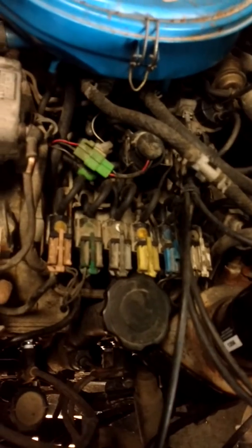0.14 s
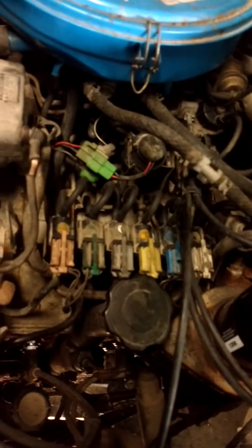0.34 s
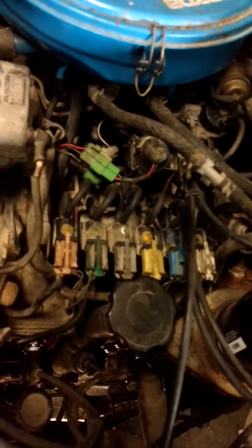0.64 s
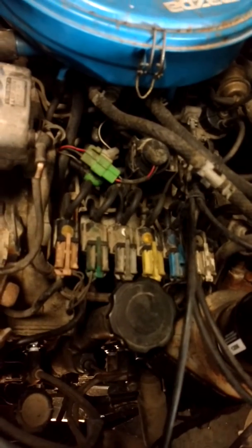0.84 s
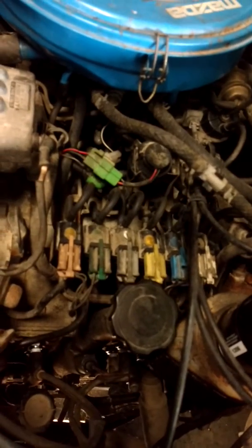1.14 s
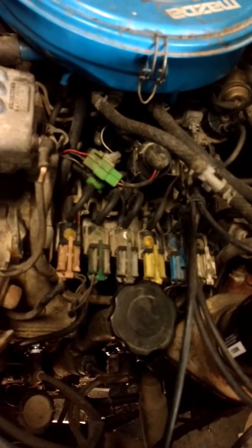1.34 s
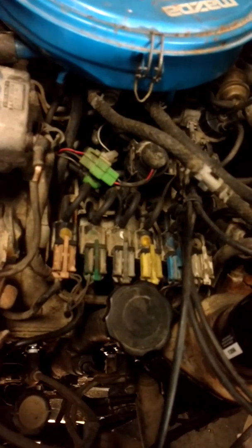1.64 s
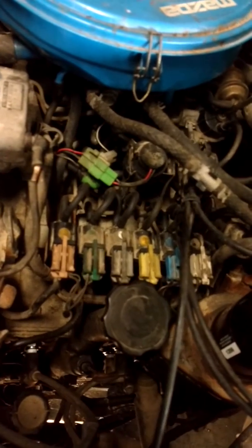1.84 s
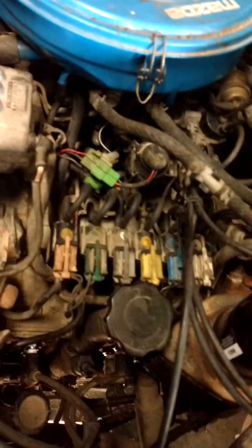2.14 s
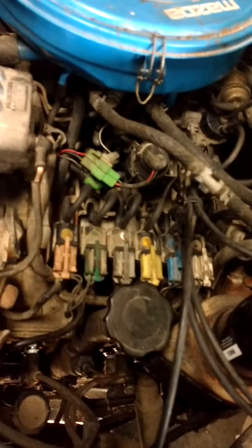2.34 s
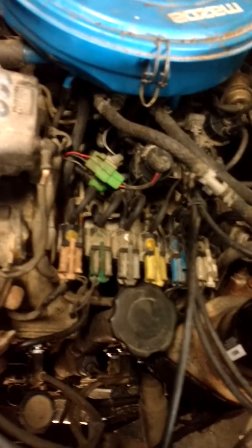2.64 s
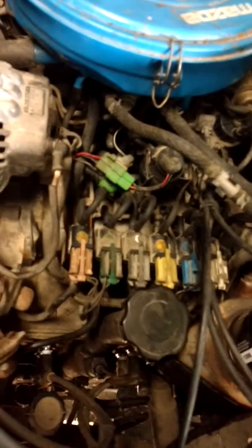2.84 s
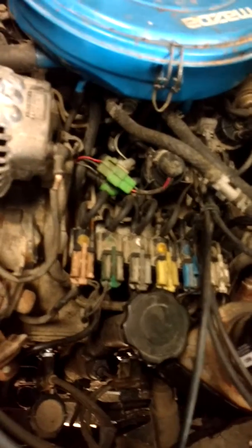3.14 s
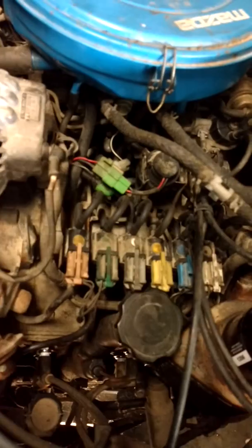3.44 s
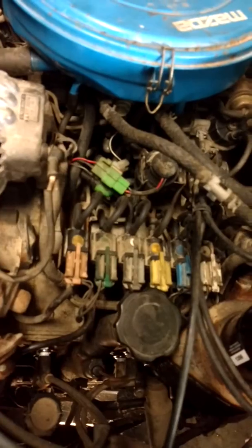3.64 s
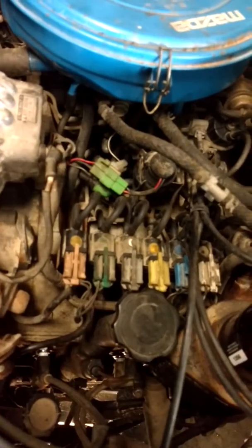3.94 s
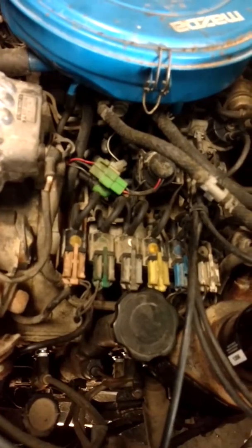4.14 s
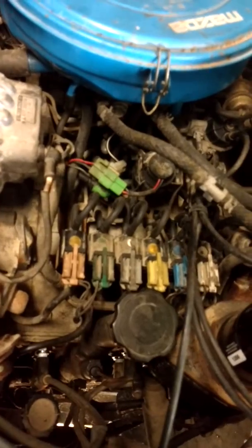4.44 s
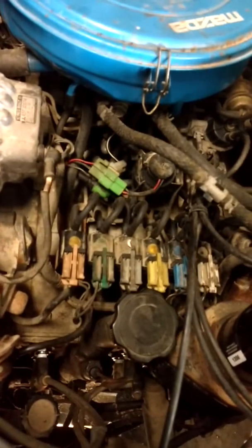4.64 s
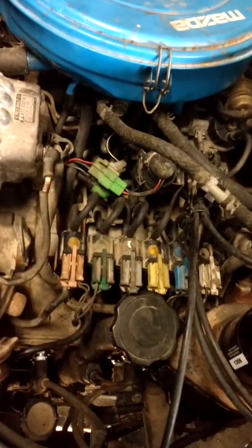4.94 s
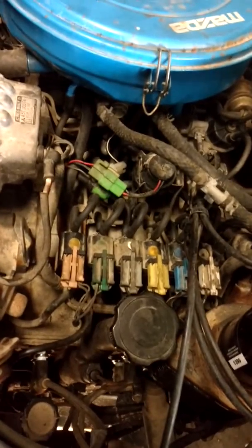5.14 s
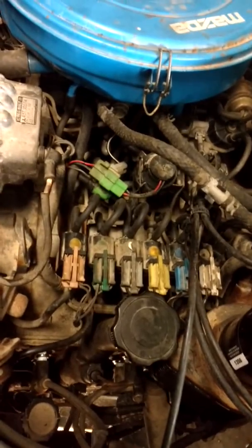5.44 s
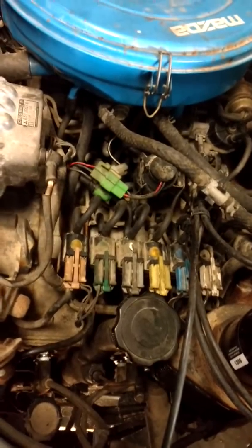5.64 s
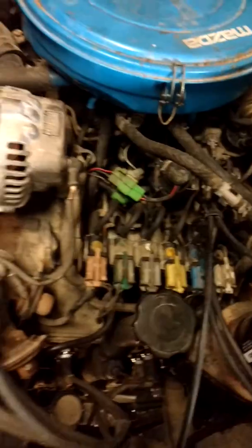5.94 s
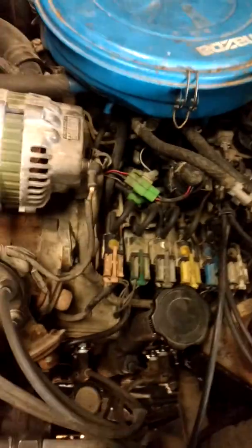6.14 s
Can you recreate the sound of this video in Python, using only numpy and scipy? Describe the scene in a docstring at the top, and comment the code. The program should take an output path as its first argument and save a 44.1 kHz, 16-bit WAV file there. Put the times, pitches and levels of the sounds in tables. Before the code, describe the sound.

Close in an open engine bay, a car engine idles roughly, already running at the start. Its hum, whine and low intake drone swell and sag about three times a second over steady rough roar and bright airy hiss. Loose parts chatter finely, with hard metal ticks now and then. Brief level dips interrupt it; near the end a sharper tick comes with a clear drop in loudness. Stereo, dry and near.

```python
"""Two-rotor engine hunting at a cold idle

Heard close up in the open engine bay: the idle surges and sags about three times a second.
Multiples of one shaft speed make the rotor beat, hum, whine and moan; free tones make the intake boom.
Shaped noise makes the rough roar, bright hiss and narrow sizzle; random taps make loose parts chatter.
Hard ticks ring in small parts, the level dips now and then, and it drops near the end with a sharp tick."""
import sys
import numpy as np
from scipy import signal
from scipy.fft import rfft, irfft
from scipy.io import wavfile
from scipy.ndimage import uniform_filter1d

SR = 44100
rng = np.random.default_rng(int(sys.argv[2]) if len(sys.argv) > 2 else 0)


def digitize_waveform(pressure):
    """Quantize a signal to 16-bit integers and store it at the path in sys.argv[1].

    Rows of a 2-D input are taken as channels; values are limited to [-1, 1].
    """
    field = np.atleast_2d(pressure).T
    bounded = np.clip(field, -1, 1)
    quanta = np.round(bounded * 32767).astype(np.int16)
    wavfile.write(sys.argv[1], SR, quanta)


N = 277824
TIME, FREQ = np.arange(N) / SR, np.fft.rfftfreq(N, 1 / SR)
PORT_HZ = 1255  # each further step of this size adds half a cycle between the two microphone ports


def gain_of(db):
    """Turns decibels into an amplitude factor."""
    return 10 ** (np.asarray(db) / 20)


def evened(x):
    """Scales a signal or response to rms 1."""
    return x / np.sqrt(np.mean(abs(x) ** 2) + 1e-20)


def read(points):
    """Draws a table of (Hz, value) along the frequency axis, straight between points in log frequency."""
    hz, value = np.transpose(points)
    return np.interp(np.log(FREQ + 1), np.log(hz + 1), value)


def bumps(rows, steep=2):
    """Adds up bell-shaped peaks in dB; the width is where a peak has half its dB."""
    return sum(db * .5 ** (abs(2 * (FREQ - hz) / width) ** steep) for hz, width, db in rows)


def wander(hz, size=4096):
    """Smooth random movement of rms 1, up to about hz."""
    slow_hz = np.fft.rfftfreq(size, N / SR / size)
    slow = irfft(rfft(rng.standard_normal(size)) * np.exp(-(slow_hz / hz) ** 2))
    return evened(np.interp(TIME, np.linspace(0, N / SR, size), slow))


def sides(db):
    """Left and right gains of mean power 1 for a left-over-right level difference."""
    pair = gain_of(np.array([db / 2, -db / 2]).reshape(2, -1))
    return pair / np.sqrt(np.mean(pair ** 2, axis=0))


# The surges of the hunting idle.
# Each row: start in seconds, length in seconds, peak extra speed in turns per second, peak swell in dB.
IDLE_SURGES = [(-0.007, 0.26, 1.29, 9.6), (0.25, 0.26, 1.17, 9.3), (0.585, 0.23, 1.18, 10),
               (0.835, 0.24, 1.27, 11), (1.143, 0.27, 1.31, 10.4), (1.475, 0.26, 1.28, 9.6),
               (1.789, 0.24, 1.01, 10), (2.085, 0.24, 1.13, 9.2), (2.42, 0.22, 0.76, 8.2),
               (2.655, 0.24, 0.95, 10.2), (2.885, 0.26, 1.05, 10.2), (3.285, 0.21, 0.7, 10.8),
               (3.505, 0.23, 0.9, 10.6), (3.7, 0.26, 0.35, 10.2), (4.115, 0.24, 0.5, 9.6),
               (4.378, 0.25, 1.27, 10.6), (4.745, 0.18, 0.65, 9.6), (4.92, 0.24, 1.0, 10.2),
               (5.185, 0.24, 0.65, 10.6), (5.415, 0.26, 1.28, 10.3), (5.74, 0.24, 1.18, 9.4),
               (5.985, 0.24, 0.91, 10.6)]


def hunting(idle_hz=22.85, speed_peakiness=1.7, swell_peakiness=.55):
    """Each surge is one arch: the sound swells at once, the heavy shaft gathers speed more gently."""
    speed, swell_db = np.full(N, idle_hz), np.zeros(N)
    for start, length, extra, db in IDLE_SURGES:
        arch = abs(np.sin(np.pi * np.clip((TIME - start) / length, 0, 1)))
        speed = speed + extra * arch ** speed_peakiness
        swell_db = swell_db + db * arch ** swell_peakiness  # below 1: broad and flat-topped
    return speed, swell_db


def shaft_turns(speed, stray=.003):
    """Adds up the speed into turns of the shaft; the speed strays at random by a small share."""
    return np.cumsum(speed * (1 + stray * wander(25))) / SR


def firings(turns, uneven_db=3, decay_s=0.0096):
    """Two firings a turn, each of its own random strength, each dying away in about ten milliseconds."""
    at = np.flatnonzero(np.diff(np.floor(2 * turns)))
    kicks = np.zeros(N)
    kicks[at] = gain_of(uneven_db * rng.standard_normal(N)[at])
    return evened(signal.lfilter([1], [1, -np.exp(-1 / (decay_s * SR))], kicks))


def lines(rows, turns, rough, flutter_hz, lead):
    """Tones at multiples of the shaft speed, shaken by uneven running; the left leads by some radians."""
    out = np.zeros((2, N))
    for multiple, db, balance_db in rows:
        shake = 1 + rough * (wander(flutter_hz) + 1j * wander(flutter_hz))
        tone = shake * np.exp(2j * np.pi * (multiple * turns + rng.random()))
        pair = evened(np.array([tone * np.exp(1j * lead), tone]).real)
        out += gain_of(db) * sides(balance_db) * pair
    return out


# Rotor beat and accessory lines.
# Each row: multiple of shaft speed, level within the layer in dB, left over right in dB.
BEAT_LINES = [(3.3, -58.5, -17), (4.02, -44.5, 9), (5.034, -45.5, 3.5), (6.04, -44.8, 13), (6.6, -56, -12),
              (11.51, -49.5, 26), (23.96, -52, -2), (66.65, -48.5, 7)]


def rotor_beat(turns):
    """Rotors and accessories turn with the shaft and hold their level almost steady through the surges."""
    return lines(BEAT_LINES, turns, rough=0.25, flutter_hz=12.4, lead=0.56)


# The main hum, probably the fan, and its octave.
# Each row: multiple of shaft speed, level within the layer in dB, left over right in dB.
HUM_LINES = [(19.04, 0.5, 2), (38.08, -8.5, 1)]


def fan_hum(turns):
    """A hum and its octave follow the shaft speed, only lightly shaken."""
    return lines(HUM_LINES, turns, rough=0.13, flutter_hz=22, lead=.2)


# Whining lines of shaft and belt-driven parts.
# Each row: multiple of shaft speed, level within the layer in dB, left over right in dB.
WHINE_LINES = [(8.03, -12, 21), (9.8, -13.5, 11), (11.7, -21, 20), (20.05, -15.5, 3), (20.47, -11.5, 4),
               (22.23, -14.5, -2), (42.1, -18, -8), (26.65, -19, 2), (39.5, -13.5, 0), (44.05, -16.5, -3),
               (51.84, -16.5, 2), (65.3, -17.5, 3), (76.7, -15, 5)]


def whine(turns):
    """Shaft and belt-driven parts whine at higher multiples of the shaft speed."""
    return lines(WHINE_LINES, turns, rough=0.22, flutter_hz=24, lead=0.9)


# The moan that stands out when the idle sags.
# Each row: multiple of shaft speed, level within the layer in dB, left over right in dB.
MOAN_LINES = [(26.28, 0, -3)]


def moan(turns):
    """A single strongly shaken tone follows the shaft speed."""
    return lines(MOAN_LINES, turns, rough=0.33, flutter_hz=12, lead=0.35)


# Low wavering tones, probably of the intake.
# Each row: centre pitch in Hz, level within the layer in dB, left over right in dB.
INTAKE_TONES = [(132, -13, 3), (197.8, 0.5, -10), (213.8, -10, -17), (228.3, -3.5, -2.5)]


def intake(stray_hz=3.59, stray_rate_hz=7, rough=.2):
    """Gulps of air keep low tones ringing; each wavers in pitch on its own, whatever the shaft does."""
    out = np.zeros((2, N))
    for hz, db, balance_db in INTAKE_TONES:
        cycles = np.cumsum(hz + stray_hz * wander(stray_rate_hz)) / SR
        tone = evened((1 + rough * wander(13)) * np.sin(2 * np.pi * cycles))
        out += gain_of(db) * sides(balance_db) * tone
    return out


def crowded_modes(size=120):
    """Countless faint modes of metal parts ripple the treble by about a dB."""
    smooth = uniform_filter1d(rng.standard_normal(len(FREQ)), size)
    ripple_db = evened(uniform_filter1d(smooth, size))
    return ripple_db * FREQ / (FREQ + 1500)


# Resonances of housings, ducts and brackets. Each row: centre in Hz, width in Hz, height in dB.
BAY_RESONANCES = [(170, 30, -1), (258, 29, -4), (426, 84, -0.5), (578, 60, -3.5), (626, 24, 3.5),
                  (794, 64, -3), (880, 115, 3.5), (1005, 74, 2), (1110, 61, -3), (1210, 63, 0.5),
                  (1534, 91, 6.5), (1697, 90, 4), (1797, 70, 4.5), (3260, 170, 2.5), (3850, 19, 4),
                  (4512, 22, 8), (6570, 75, 5), (6890, 140, 4), (8300, 210, -5), (8800, 28, -7)]
# How alike the two ports sound. Each row: frequency in Hz, likeness from 0 to 1.
PORT_LIKENESS = [(30, 0.6), (100, 0.3), (300, 0.3), (500, 0.62), (800, 0.62), (1200, 0.7), (1850, 0.5),
                 (3100, 0.2), (4300, 0.2), (5600, 0.52), (8200, 0.74), (9500, 0.74), (11800, 0.45),
                 (14000, 0.2)]
# How much of the missing likeness returns where the ports are in step or opposed.
# Each row: frequency in Hz, share from 0 to 1.
ALIGNED_LIKENESS = [(650, 0), (1200, 0.9), (5000, 0.95), (6300, 0.7), (7600, 0.55), (10000, 0.9),
                    (11200, 0.75), (12500, 0.5), (15000, 0.6)]
# Balance between the ports. Each row: frequency in Hz, left over right in dB.
PORT_BALANCE = [(100, 7), (220, -5.5), (500, 0.5), (4000, -0.5), (6500, -4), (9500, -3.5), (13000, -2)]


def ports(drive, spectrum):
    """Two unrelated noises ring the bay and blend at two ports, most alike when in step or opposed."""
    first, second = rfft(drive)
    lead = np.pi * np.maximum(FREQ / PORT_HZ - 1, 0)  # phase of the right port ahead of the left
    same = read(PORT_LIKENESS)
    same = np.clip(same + (1 - same) * read(ALIGNED_LIKENESS) * np.cos(lead) ** 2, 0, 1)
    right = (same * first + np.sqrt(1 - same ** 2) * second) * np.exp(1j * lead)
    colour = gain_of(read(spectrum) + bumps(BAY_RESONANCES) + crowded_modes())
    return evened(irfft(np.array([first, right]) * sides(read(PORT_BALANCE)) * colour, N))


# Tone of the roar before the bay colours it. Each row: frequency in Hz, relative density in dB per Hz.
ROAR_SPECTRUM = [(20, -38), (45, -27), (65, -22), (85, -9), (130, -10.5), (210, -3.5), (300, -4),
                 (420, -0.5), (540, 1), (780, -3.5), (1100, -3.5), (1900, -6.5), (2500, -3), (3500, -11.5),
                 (6000, -75)]
# Slow drift of the roar. Each row: time in seconds, level change in dB.
ROAR_LEVEL_DRIFT = [(0.1, -0.8), (0.5, 0.5), (1.0, 0.5), (1.55, -1), (1.85, 0.3), (2.35, 1), (2.8, 0.1),
                    (3.9, 0.3), (4.12, 0.5), (4.3, 1.1), (6.1, -0.4), (6.3, -2.5)]


def roar(bursts, pulsing=0.047):
    """Intake and fan turbulence is shaped noise, puffed by each firing."""
    drift = gain_of(np.interp(TIME, *np.transpose(ROAR_LEVEL_DRIFT)))
    turbulence = (1 + pulsing * bursts) * rng.standard_normal((2, N))
    return drift * ports(turbulence, ROAR_SPECTRUM)


# Tone of the hiss before the bay colours it. Each row: frequency in Hz, relative density in dB per Hz.
HISS_SPECTRUM = [(500, -27), (2000, -47), (2900, -5.5), (3700, -4.5), (5000, -3), (6500, -2), (9000, 0.3),
                 (11000, -5.5), (13000, -10.5), (15300, -14)]
# Throbbing of the hiss with turning parts. Each row: multiple of shaft speed, depth as a share.
HISS_THROB = [(0.513, 0.025), (0.826, 0.042), (1.65, 0.042)]


def hiss(turns, bursts, pulsing=0.021, flicker_db=0.82, ticks_per_s=450, tick_share=0.18):
    """Rushing air throbs with the shaft and flickers, peppered with tiny metal ticks."""
    throb = 1 + sum(depth * np.sin(2 * np.pi * multiple * turns) for multiple, depth in HISS_THROB)
    tiny_ticks = evened(rng.standard_normal((2, N)) * (rng.random(N) < ticks_per_s / SR))
    air = (1 + pulsing * bursts) * rng.standard_normal((2, N))
    flicker = gain_of(flicker_db * wander(40))
    return ports(throb * flicker * (air + tick_share * tiny_ticks), HISS_SPECTRUM)


# The band of a small sizzling part. The one row: centre in Hz, width in Hz.
SIZZLE_BAND = (8850, 760)


def sizzle(turns, swing_db=6.5, balance_db=13.0):
    """Noise in a narrow, high band rises and falls about once every two turns, mostly on the left."""
    hz, width = SIZZLE_BAND
    swing = swing_db * np.sin(2 * np.pi * HISS_THROB[0][0] * turns)
    drive = gain_of(swing) * rng.standard_normal(N)
    resonance = 1 / (1 + 2j * (FREQ - hz) / width) ** 2
    return sides(balance_db) * evened(irfft(rfft(drive) * resonance, N))


# Small loose parts. Each row: ring in Hz, level within the layer in dB, decay in seconds.
LOOSE_PARTS = [(3815, -11, .004), (6530, -2, .0025), (6880, -11, .0015), (8690, -2, .0015),
               (8925, 0, .0025), (11100, -7, .0006)]


def chatter(per_s=40, spread_db=3.0, crack=.25):
    """Loose clips and linkages tap at random, each with a crack and its own short ring."""
    out = np.zeros(len(FREQ), complex)
    for hz, db, decay in LOOSE_PARTS:
        strength = gain_of(spread_db * np.minimum(rng.exponential(1, N), 2))
        taps = (rng.random(N) < per_s / SR) * strength
        ring = 1 / (1 + 2j * np.pi * (FREQ - hz) * decay)
        out += gain_of(db) * rfft(taps) * evened(ring + crack * abs(ring) ** .5)
    lead = np.pi * (FREQ / PORT_HZ - 1)  # phase of the right port ahead of the left
    pair = np.array([out, out * np.exp(1j * lead)])
    return evened(irfft(pair * sides(read(PORT_BALANCE)), N))


# Sharp metal ticks. Each row: start in seconds, peak level in dB, ring in Hz.
METAL_TICKS = [(0.197, -16, 6555), (.6765, -16, 8900), (1.173, -19, 8930), (1.4315, -16, 6860),
               (1.695, -17, 6555), (2.524, -16, 6555), (3.263, -19, 6555), (3.53, -18, 8930),
               (4.203, -18, 8650), (5.097, -17, 8930), (5.529, -14.5, 8650), (5.805, -16, 8930),
               (6.113, -11.5, 6555)]


def ticks(decay_s=0.002, width_hz=600, crack=0.27):
    """Single hard ticks: a short noise burst makes a crack and a ring in a small part."""
    out = np.zeros(N)
    for start, db, hz in METAL_TICKS:
        age = TIME - start
        burst = rng.standard_normal(N) * np.exp(-abs(age) / decay_s) * (age >= 0)
        colour = crack * FREQ / (FREQ + hz) + 1 / (1 + 2j * (FREQ - hz) / width_hz)
        tick = irfft(rfft(burst) * colour, N)
        out += gain_of(db) * tick / abs(tick).max()
    return out


# Abrupt dips in level. Each row: start in seconds, depth in dB, recovery in seconds.
LEVEL_DIPS = [(1.01, 2.5, 0.14), (1.43, 0, 0.35), (2.53, 2, 0.13), (3.04, 2, 0.39), (3.711, 3, 0.55),
              (4.201, 2.2, 0.62), (4.87, 3.5, 0.07), (5.1, 2, 0.33), (6.111, 5.5, 2.8)]


def dips(fall_s=0.017):
    """The level falls quickly, then creeps back at a steady rate in dB."""
    drop_db = sum(np.interp(TIME - start, [0, fall_s, fall_s + recovery], [0, db, 0])
                  for start, db, recovery in LEVEL_DIPS)
    return gain_of(-drop_db)


# The mix, by layer name.
# Each row: level between surges in dB, dB gained per dB of swell, random waver in dB.
LAYER_MIX = {"beat": (-.2, 0.11, 0.26), "whine": (-42.5, 1.06, 0.68), "roar": (-27.3, 0.063, 0.49),
             "hum": (-44.2, 1.24, 0.26), "moan": (-43, -.35, 2.5), "intake": (-47.8, 0.95, .8),
             "hiss": (-25.8, 0.031, 0.36), "sizzle": (-39, 0.02, 1), "chatter": (-36.5, .05, .5)}


def scene():
    """One shaft drives the engine; hum, whine and intake swell far more with a surge than the noise."""
    speed, swell_db = hunting()
    turns = shaft_turns(speed)
    bursts = firings(turns)
    sounds = {"beat": rotor_beat(turns), "hum": fan_hum(turns), "whine": whine(turns),
              "moan": moan(turns), "intake": intake(), "roar": roar(bursts),
              "hiss": hiss(turns, bursts), "sizzle": sizzle(turns), "chatter": chatter()}
    engine = np.zeros((2, N))
    for name, (db, follow, waver_db) in LAYER_MIX.items():
        engine += sounds[name] * gain_of(db + follow * swell_db + waver_db * wander(13))
    return engine * dips() + ticks()


# Narrow nulls of the port pair, in the sum and in the difference of the channels.
# Each row: centre in Hz, width in Hz, depth in dB.
SUM_NOTCHES = [(2530, 441, 38), (4875, 430, 41), (10000, 320, 18)]
DIFFERENCE_NOTCHES = [(1210, 310, 17), (3700, 320, 35)]


def record(dry, edge_hz=15450):
    """The port pair cancels narrow bands in sum and difference; then a steep low-pass limits the band."""
    left, right = rfft(dry)
    mid = (left + right) / 2 * gain_of(-bumps(SUM_NOTCHES, steep=5))
    side = (left - right) / 2 * gain_of(-bumps(DIFFERENCE_NOTCHES, steep=1.5))
    pair = irfft(np.array([mid + side, mid - side]), N)
    low_pass = signal.firwin(1023, edge_hz, window=("kaiser", 9), fs=SR)
    return signal.oaconvolve(pair, low_pass[None], "same")


dry = scene()
out = record(dry)
digitize_waveform(out)
```